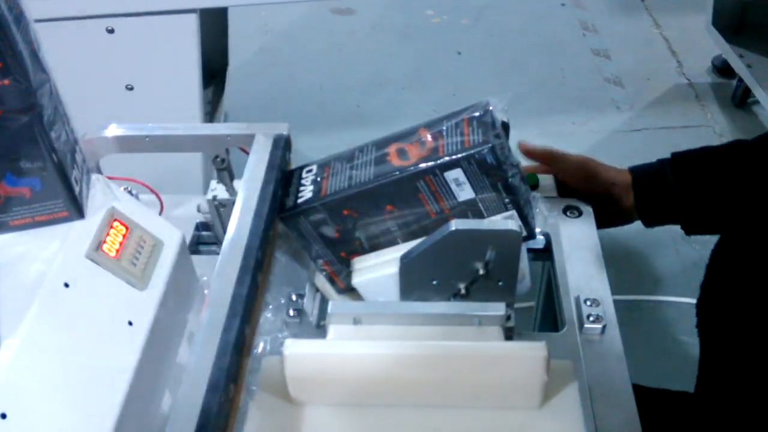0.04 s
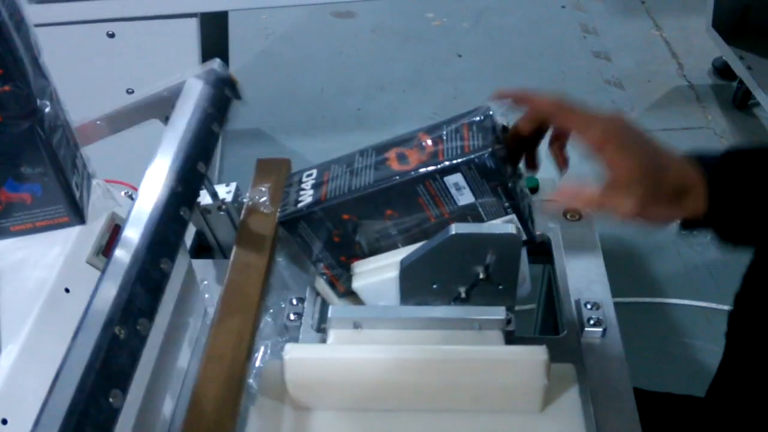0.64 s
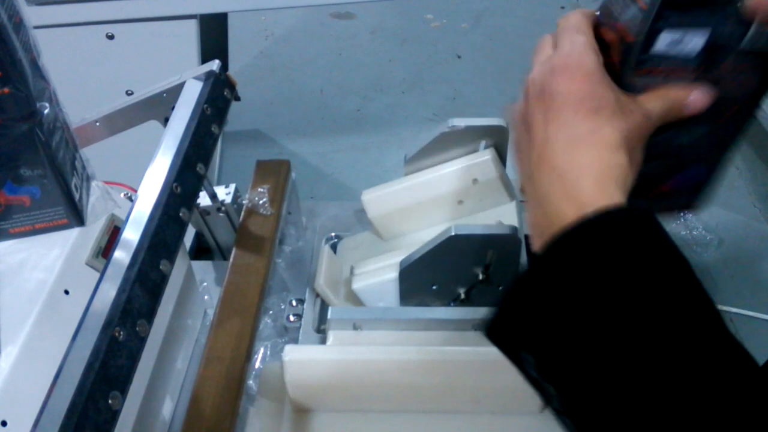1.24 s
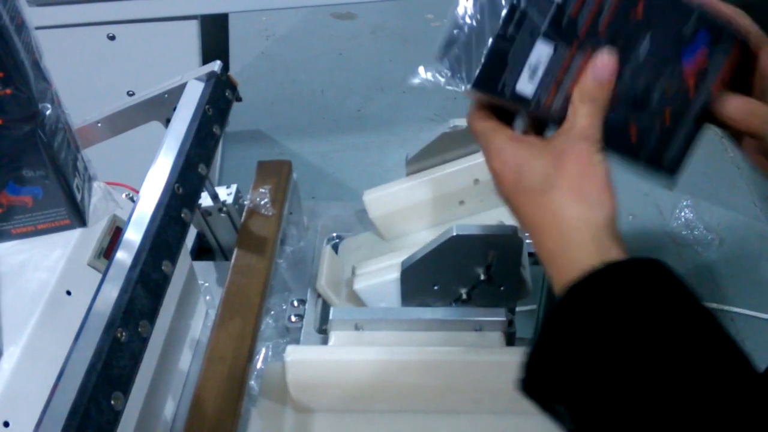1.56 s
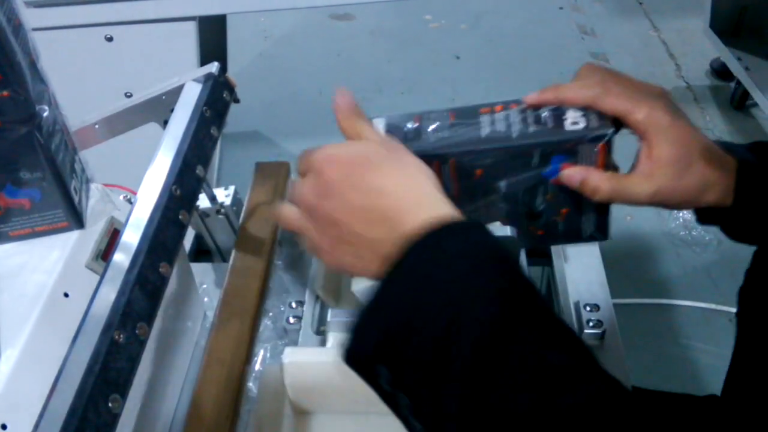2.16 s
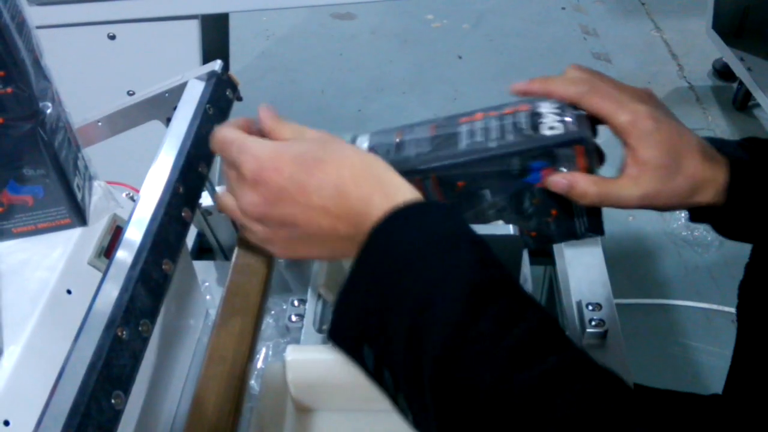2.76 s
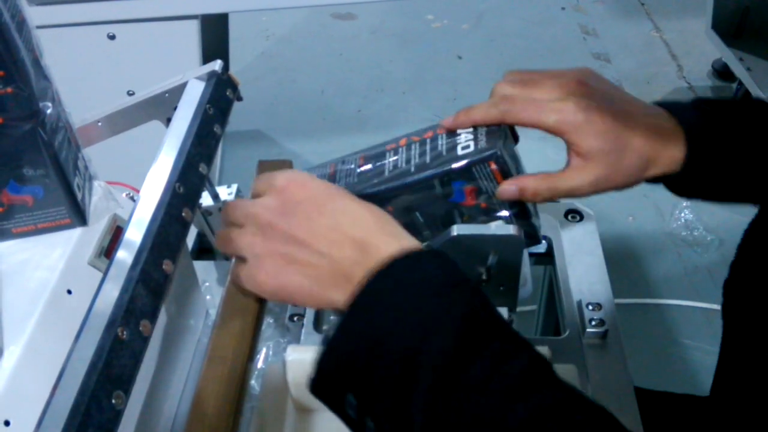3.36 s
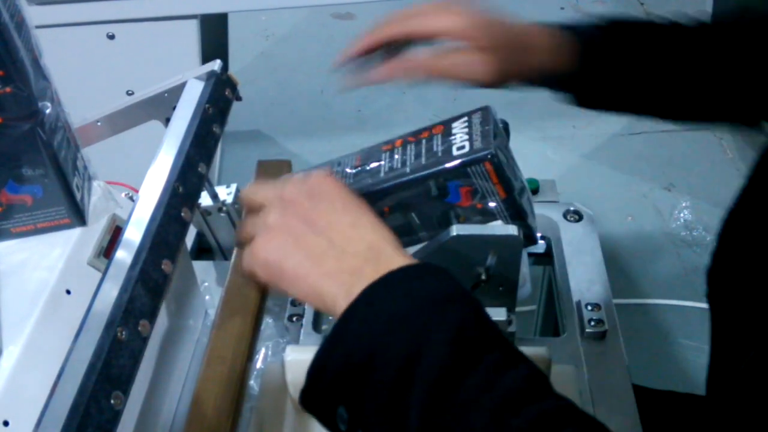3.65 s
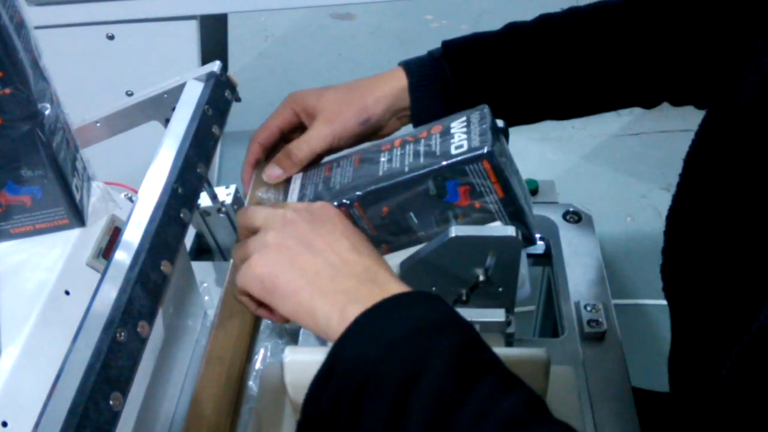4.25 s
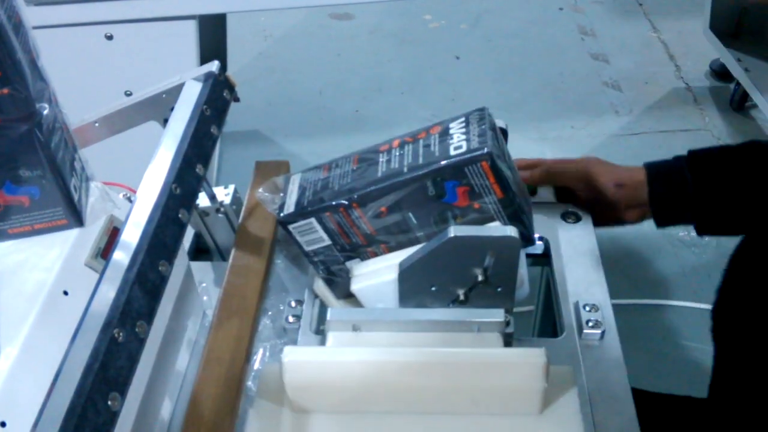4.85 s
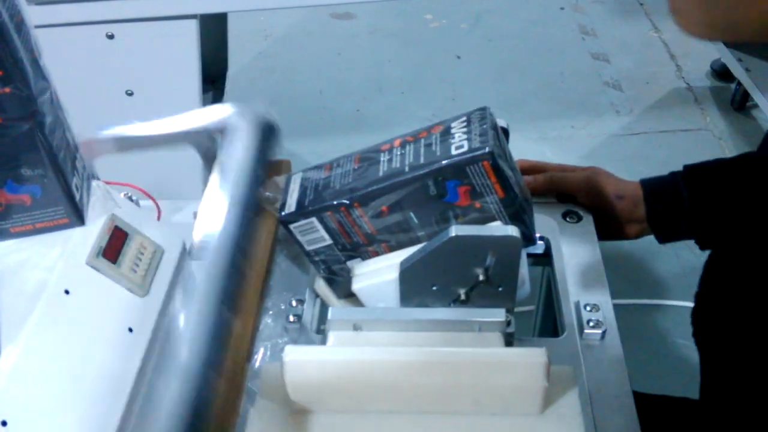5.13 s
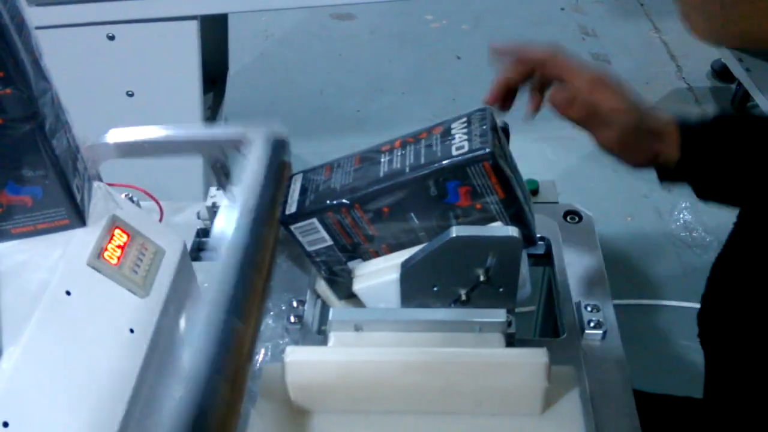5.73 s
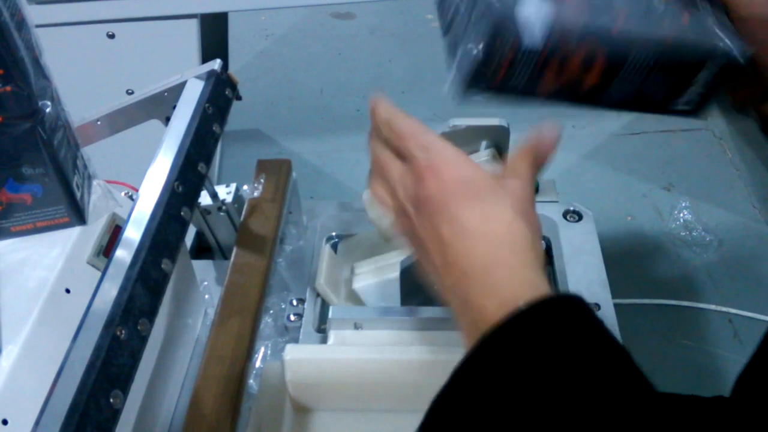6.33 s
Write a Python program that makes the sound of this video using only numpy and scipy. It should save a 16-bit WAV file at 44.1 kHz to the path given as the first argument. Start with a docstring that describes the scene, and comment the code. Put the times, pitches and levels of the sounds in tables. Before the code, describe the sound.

A fan's low rumble and airy rush run throughout, with a thin, high motor whine, close to a pneumatic film sealer in a workshop. Right at the start, a sharp hiss of air dies away as the sealing bar thuds onto its pad. At about 0.5 seconds another short hiss lifts the bar, ending in a metal clank and rattle at 0.7. From 0.9 to 4.2 seconds a wrapped carton is handled, with quieter, scattered hollow bumps and brief film crackles, clearest around 1.7 and 2.4. Just before 5 seconds a valve clicks sharply, then air jets out and the bar thuds down at about 5.2. At 5.8 another burst of air raises it, and it clatters against its upper stop near 5.9. A last carton bump comes at 6.5. The hisses are the loudest sounds, and the strokes and bumps echo briefly around the room.

```python
"""Sharp hisses of air, thuds and clanks over a steady whir: a pneumatic film sealer in a workshop.
A solenoid valve clicks, then air jets from an exhaust port while the cylinder moves the sealing bar.
Going down, the bar thuds onto its pad; going up, it clatters against its upper stop.
Between strokes a wrapped carton is handled, with hollow bumps and crackling film.
A fan rumbles and a motor drive whines throughout, and the strokes and bumps echo around the room."""
import sys
import numpy as np
from scipy import signal
from scipy.fft import rfft, irfft, next_fast_len
from scipy.io import wavfile
from scipy.ndimage import map_coordinates

SR = 44100
rng = np.random.default_rng(int(sys.argv[2]) if len(sys.argv) > 2 else 0)


def int16_out(signal):
    """Quantize to a 16-bit WAV file."""
    q = np.round(np.clip(np.atleast_2d(signal).T, -1, 1) * 32767)
    wavfile.write(sys.argv[1], SR, q.astype(np.int16))


N = 291060

# The background swells around the strokes. Each row: time in seconds, relative level in dB.
BACKGROUND_SWELL = [(0.0, -34), (0.31, -36.5), (0.57, -36.5), (0.7, -33), (1.25, -37.5), (1.8, -36),
                    (2.65, -39.5), (4.85, -39.5), (5.02, -36.5), (5.16, -34.5), (5.42, -35), (5.77, -37.5),
                    (5.94, -33), (6.32, -35.5), (6.6, -38)]
# The fan's low rumble and airy rush. Each row: frequency in Hz, relative level in dB.
FAN_RUMBLE = [(25, -29), (50, -29), (75, -22.5), (100, -10), (133, -18), (165, -5.5), (192, 0.5),
              (220, -3.5), (248, 0.5), (272, -1.5), (297, -0.5), (400, -3), (460, -10.5), (700, -32)]
FAN_RUSH = [(250, -41.5), (420, -15), (480, -14), (516, -7), (828, -4.5), (912, -8.5), (1280, -5),
            (1630, -5), (2000, -3.5), (3670, -11), (3810, -10), (4000, -10.5), (4410, -10.5), (4570, -11),
            (7600, -23.5), (9880, -51.5), (16700, -120)]
# Narrow peaks in the steady airy rush, plus a broad bright hump near 7 kHz.
# Each row: centre in Hz, width in Hz, boost in dB.
RUSH_PEAKS = [(922, 31, 7.5), (1042, 26, 5), (1145, 28, 6.5), (1257, 13, 6.5), (1515, 7.1, 8.5),
              (2056, 65, 2), (2280, 22, 5.5), (7110, 470, 8.5)]
# The drive's three switching tones. Each entry: pitch in Hz.
SWITCHING_HZ = [3880.6, 4119.2, 4357.9]
# Their loudness. Each row: level in dB, dB gained per dB of background swell.
SWITCHING_LEVELS = [(-41.5, 0.9), (-46, 1.3), (-47, 0.2)]
# Their sidebands. Each row: lower and upper sideband level in dB relative to the tone.
SIDEBAND_LEVELS = [(-24.5, -10.5), (-10, -13.5), (-8.5, -20)]
# Fainter whistles of the drive. Each row: pitch in Hz, level in dB.
FAINT_WHISTLES = [(3685, -62), (4279.5, -62), (4510, -60)]

# Echoes of the near walls and the hall. Each row: frequency in Hz, time to fall 60 dB in seconds.
WALL_DECAY = [(200, 0.22), (2000, 0.54), (8000, 0.19)]
HALL_DECAY = [(200, 0.75), (2000, 0.68), (5000, 0.73), (8000, 0.56)]
# Colour of the hiss that spreads into the room. Each row: frequency in Hz, gain in dB.
ROOM_HISS_EQ = [(100, 1), (500, 2), (2800, 0), (4200, 1.5), (5200, -1), (6400, -8.5), (7050, 5),
                (7700, 0.5)]

# Touches on the carton. Each row: start in seconds, bump level in dB, crackle level in dB.
CARTON_TOUCHES = [(.365, -27.5, -57), (.9, -29, -49), (1.322, -49, -34), (1.343, -52, -53),
                  (1.408, -30.5, -48), (1.653, -32, -30.5), (1.721, -36, -35.5), (2.336, -34.5, -39),
                  (2.468, -41, -37.5), (3.523, -33.5, -55), (4.166, -34, -65), (6.531, -27.5, -39)]
# Strokes that lower the bar, and strokes that lift it. Each row: start in seconds, air flow in dB.
DOWN_STROKES = [(-.164, -15.5), (5.045, -17)]
UP_STROKES = [(.538, -15), (5.756, -14.5)]
# The linkage jolts as the rising bar brakes. Each row: seconds into the stroke, clank dB, rattle dB.
BRAKING_JOLTS = [(0.1606, -18.5, -21), (0.176, -35, -21), (.197, -50, -32.5)]
# The bar hits its upper stop and rebounds once. Each row: seconds into the stroke, level in dB.
STOP_KNOCKS = [(.187, -19.5), (.212, -28)]

# How each struck part rings. Each row: pitch in Hz, relative level in dB, seconds to fall 60 dB.
CARTON_MODES = [(195.3, 2, 0.21), (240, -7.5, 0.14), (293, -5, 0.039), (370, 2.5, 0.06), (1180, -22.5, .04)]
VALVE_MODES = [(2380, -8, .022), (2500, -4, 0.018), (5230, -12, 0.025), (6374, -13, 0.022),
               (7300, -4, 0.035), (7600, -11, .02)]
CYLINDER_MODES = [(406, -11, 0.32), (534, 0, 0.055), (786, -1, 0.061), (990, -5.5, 0.037)]
PAD_MODES = [(107, -11.5, 0.15), (351.5, -6, 0.25), (550, -6.5, 0.1), (625, -4, 0.073), (631, 1, 0.043)]
LINKAGE_MODES = [(450, -3.5, 0.08), (1218, 6, 0.067), (1660, -7, .08), (2025, 3, 0.11)]
FRAME_MODES = [(191.8, -7.5, 0.23), (386, -5.5, 0.11), (416, -2, .09), (567, -4.5, 0.093), (676, 0, 0.1),
               (800, -14, 0.14), (968, -10.5, 0.2), (1430, -6.5, 0.14)]
# Noise colours of the film, the linkage, the machine's bed and the air jet.
# Each row: frequency in Hz, relative level in dB.
FILM_CRACKLE = [(400, -12), (1100, 3), (2300, -6), (3500, -8), (6500, -1), (8000, -6.5)]
LINKAGE_RATTLE = [(120, -44), (450, 5), (850, -8), (1250, -2), (1700, -1.5), (2400, 0), (3300, -3),
                  (4500, -21), (8000, -30)]
BED_THUMP = [(40, -31), (75, -13.5), (130, -6.5), (250, -4), (420, 0), (680, -3), (900, -9.5), (2000, -37)]
JET_HISS = [(100, -38.5), (400, -9), (1000, -34), (1600, -10), (2600, -8), (4200, -6), (5000, 1.5),
            (6500, 4.5), (7500, 2.5), (8000, -3.5)]
# Peaks and notches of the two exhaust ports. Each row: centre in Hz, width in Hz, gain in dB.
DOWN_PORT = [(3060, 90, 7), (3556, 39, 16), (4200, 250, 5), (4790, 81, 12), (5070, 100, 11),
             (5500, 270, 5.5), (5800, 90, -2), (6560, 45, -11.5), (6690, 160, 11.5), (7320, 160, 7)]
UP_PORT = [(1700, 130, 9.5), (3590, 150, 10.5), (4020, 290, -23.5), (4750, 90, 2.5), (5090, 120, 9),
           (5550, 82, -2.5), (5740, 60, 6), (6460, 68, 6.5), (6800, 130, 6.5), (7170, 95, 13.5)]


def amp(db):
    """Decibels to gain."""
    return 10 ** (np.asarray(db) / 20)


def along(points, hz):
    """Read (Hz, value) points on a log frequency axis."""
    freqs, values = np.transpose(points)
    return np.interp(np.log(hz + 1), np.log(freqs + 1), values)


def wobble(rate):
    """A smooth random curve with `rate` knots a second."""
    knots = rng.standard_normal(int(N * rate / SR) + 4)
    return map_coordinates(knots, [np.arange(N) * rate / SR])


def filtered(x, response):
    """Equalise x by a gain that depends on frequency."""
    size = next_fast_len(N + SR // 2)
    return irfft(rfft(x, size) * response(np.fft.rfftfreq(size, 1 / SR)), size)[..., :N]


def noise(spectrum, resonances=()):
    """Noise of rms 1: a broad colour with resonant humps."""
    def response(hz):
        humps = sum(db * np.exp(-((hz - centre) / width) ** 2) for centre, width, db in resonances)
        return amp(along(spectrum, hz) + humps)
    coloured = filtered(rng.standard_normal(N), response)
    return coloured / np.sqrt(np.mean(coloured ** 2) + 1e-20)


def add(track, start_s, sound):
    """Mix a sound into a track, trimming what falls outside."""
    start = round(start_s * SR)
    part, rest = track[max(start, 0):], sound[max(-start, 0):]
    part[:len(rest)] += rest[:len(part)]


def struck(hits, modes, attack_s):
    """Each (seconds, dB) blow rings the modes at slightly new strengths and pitches."""
    out, t = np.zeros(N), np.arange(SR // 2) / SR
    hz, level_db, t60 = np.transpose(modes)[:, :, None]
    for start, db in hits:
        strength, detune = rng.standard_normal((2, *hz.shape))
        phase = 2 * np.pi * hz * (1 + .006 * detune) * t
        ring = (amp(level_db + 1.5 * strength - 60 * t / t60) * np.sin(phase)).sum(0)
        add(out, start, amp(db) * ring * (1 - np.exp(-t / attack_s)))
    return out


def bursts(hits, spectrum, t60, attack_s):
    """Each (seconds, dB) blow sets off a dying burst of noise."""
    envelope, t = np.zeros(N), np.arange(SR // 2) / SR
    for start, db in hits:
        add(envelope, start, amp(db - 60 * t / t60) * (1 - np.exp(-t / attack_s)))
    return envelope * noise(spectrum)


def during(strokes, blows):
    """Cue the same (seconds into the stroke, dB, ..) blows in every stroke."""
    return np.array([(start + delay, *levels) for start, _ in strokes for delay, *levels in blows])


def reverb(x, decay, delay_s):
    """A diffuse tail in which each frequency dies at its own speed."""
    hz, t, spectra = signal.stft(rng.standard_normal(SR), SR, nperseg=256)
    fade = amp(-60 * t / along(decay, hz)[:, None])
    tail = signal.istft(spectra * fade, SR, nperseg=256)[1]
    tail = np.pad(tail / np.linalg.norm(tail), (int(delay_s * SR), 0))
    return signal.fftconvolve(x, tail)[:N]


def fan(swell_db):
    """A low rumble and a steady rush of air."""
    rumble = amp(-37 + .8 * swell_db + .67 * wobble(10)) * noise(FAN_RUMBLE)
    rush = amp(-36.5 + swell_db + .63 * wobble(12)) * noise(FAN_RUSH, RUSH_PEAKS)
    return rumble + rush


def motor_drive(swell_db, beat_hz=43.1):
    """The drive whines on three wavering switching tones, each beating with its sidebands."""
    t = np.arange(N) / SR
    tone = lambda hz: np.sqrt(2) * np.sin(2 * np.pi * (hz * t + rng.random()))
    whine = sum(amp(db) * tone(hz) for hz, db in FAINT_WHISTLES)
    for hz, (lower_db, upper_db), (db, follow) in zip(SWITCHING_HZ, SIDEBAND_LEVELS, SWITCHING_LEVELS):
        sidebands = amp(lower_db) * tone(hz - beat_hz) + amp(upper_db) * tone(hz + beat_hz)
        waver_db = -1.44 * wobble(5)
        whine += amp(db + follow * swell_db + waver_db) * (tone(hz) + sidebands)
    return whine


def workshop_echo(contacts, clicks, flow):
    """The near walls and the hall throw back the knocks, clicks and hiss."""
    # summed over all directions, the jet loses the narrow peaks of its ports
    hiss = amp(2) * exhaust(flow, port=[], flutter_db=2.5)
    scattered = contacts + amp(-4) * clicks + filtered(hiss, lambda hz: amp(along(ROOM_HISS_EQ, hz)))
    walls = amp(-11) * reverb(scattered, WALL_DECAY, delay_s=.006)
    return walls + amp(-14.5) * reverb(scattered, HALL_DECAY, delay_s=.015)


def carton():
    """Handling bumps the hollow box and crackles its film."""
    touches = np.array(CARTON_TOUCHES)
    crackle = bursts(touches[:, [0, 2]], FILM_CRACKLE, t60=.12, attack_s=.001) * amp(3 * wobble(500))
    return struck(touches[:, [0, 1]], CARTON_MODES, attack_s=.0035) + crackle


def valve(lead_s=.0685):
    """The solenoid's armature ticks, then snaps onto its seat just before a down stroke."""
    tick, seat = (-lead_s - .003, -26.5), (-lead_s, -9)
    clicks = during(DOWN_STROKES, [tick, seat])
    ring = struck(clicks, VALVE_MODES, attack_s=.0013)
    return ring + amp(-12.5) * bursts(clicks, JET_HISS, t60=.056, attack_s=.00067)


def sealing_bar(lurch_lead_s=.0018, landing_s=.197):
    """The piston lurches; the bar thuds on its pad going down and clanks on the frame going up."""
    # just ahead of the main flow, the piston breaks loose and the linkage takes up its slack
    strokes = DOWN_STROKES + UP_STROKES
    lurch = struck(during(strokes, [(-lurch_lead_s, -24.5)]), CYLINDER_MODES, attack_s=.0014)
    slack = during(strokes, [(-lurch_lead_s, -41.5, -23.5)])  # clank dB, rattle dB

    landings = during(DOWN_STROKES, [(landing_s, -20)])
    thud = struck(landings, PAD_MODES, attack_s=.0017)
    thud += amp(-5) * bursts(landings, BED_THUMP, t60=.2, attack_s=.003)

    jolts = np.vstack([slack, during(UP_STROKES, BRAKING_JOLTS)])
    clank = struck(jolts[:, [0, 1]], LINKAGE_MODES, attack_s=.0052)
    rattle = bursts(jolts[:, [0, 2]], LINKAGE_RATTLE, t60=.14, attack_s=.0014)

    knocks = during(UP_STROKES, STOP_KNOCKS)
    stop = struck(knocks, FRAME_MODES, attack_s=.0015)
    stop += amp(-8.5) * bursts(knocks, BED_THUMP, t60=.12, attack_s=.002)
    return lurch + thud + clank + rattle * amp(1.8 * wobble(300)) + stop


def cushion(entry_s=.157, width_s=.003, choke_db=-20):
    """The flow chokes for an instant as the rising piston enters its end cushion."""
    t = np.arange(N) / SR
    dips = sum(np.exp(-((t - start - entry_s) / width_s) ** 2) for start, _ in UP_STROKES)
    return amp(choke_db * dips)


def airflow(strokes, hold_s, release_s, leak_db, leak_s=.015, attack_s=.014, surge_s=.022):
    """Air leaks as the valve shifts, surges with stored pressure, holds during travel, then dies."""
    flow = np.zeros(N)
    for start, db in strokes:
        t = np.arange(N) / SR - start
        leak = amp(leak_db) * np.interp(t, [-leak_s, -leak_s / 2, attack_s], [0, 1, 0])
        surge_db = 7 * np.exp(-np.maximum(t, 0) / surge_s)
        fall_db = -60 * np.maximum(t - hold_s, 0) / release_s
        flow += amp(db) * (leak + np.clip(t / attack_s, 0, 1) * amp(surge_db + fall_db))
    return flow


def exhaust(flow, port, flutter_db):
    """A turbulent jet sputters through the resonances of its port while the cylinder vents."""
    return flow * amp(flutter_db * wobble(650)) * noise(JET_HISS, port)


def scene():
    """The mono mix: the sealer and the carton echo in the workshop over the fan and the drive."""
    flicker = amp(.9 * wobble(76))
    down_flow = flicker * airflow(DOWN_STROKES, hold_s=.2, release_s=.12, leak_db=-24)
    up_flow = flicker * cushion() * airflow(UP_STROKES, hold_s=.19, release_s=.032, leak_db=-10)
    down_hiss = amp(2) * exhaust(down_flow, DOWN_PORT, flutter_db=.5)
    up_hiss = amp(-1) * exhaust(up_flow, UP_PORT, flutter_db=1)
    contacts = sealing_bar() + carton()
    clicks = valve()
    echo = workshop_echo(contacts, clicks, down_flow + up_flow)
    swell_db = np.interp(np.arange(N) / SR, *np.transpose(BACKGROUND_SWELL))
    swell_db -= swell_db.mean()
    mono = fan(swell_db) + motor_drive(swell_db) + echo + contacts + clicks + down_hiss + up_hiss
    return np.array([mono, mono])


def record(dry, low_cut_hz=55, high_cut_hz=7720):
    """The microphone loses the deepest bass and cuts the top off steeply."""
    thinned = signal.sosfilt(signal.butter(2, low_cut_hz, "highpass", fs=SR, output="sos"), dry)
    return filtered(thinned, lambda hz: 1 / np.sqrt(1 + (hz / high_cut_hz) ** 170))


dry = scene()
out = record(dry)
int16_out(out)
```